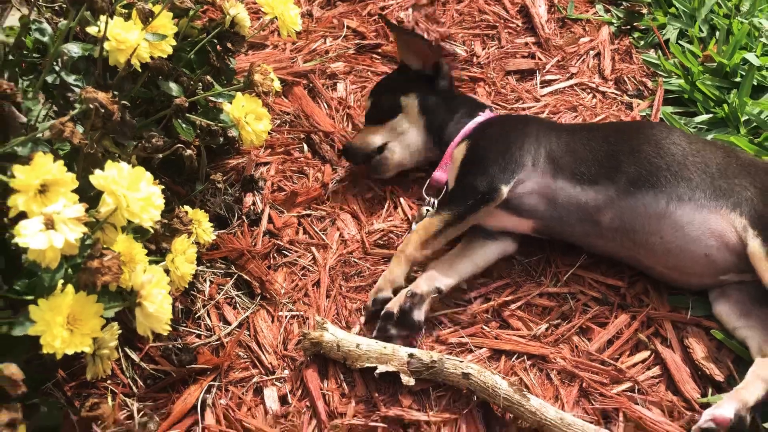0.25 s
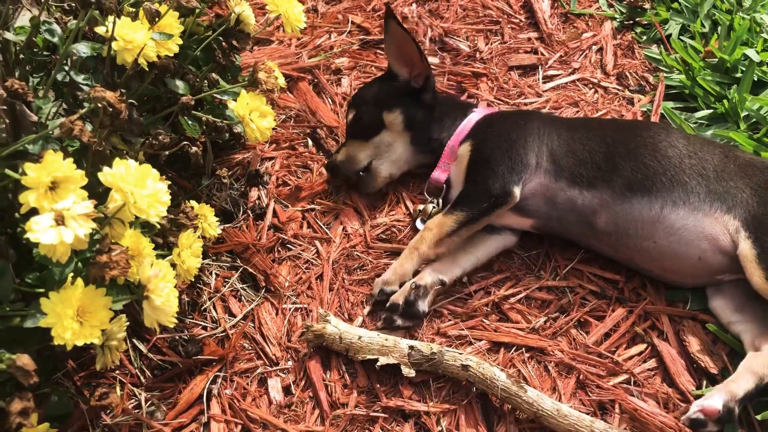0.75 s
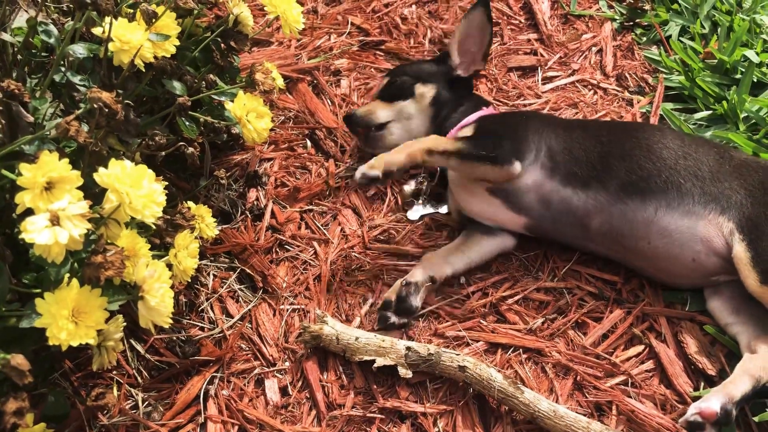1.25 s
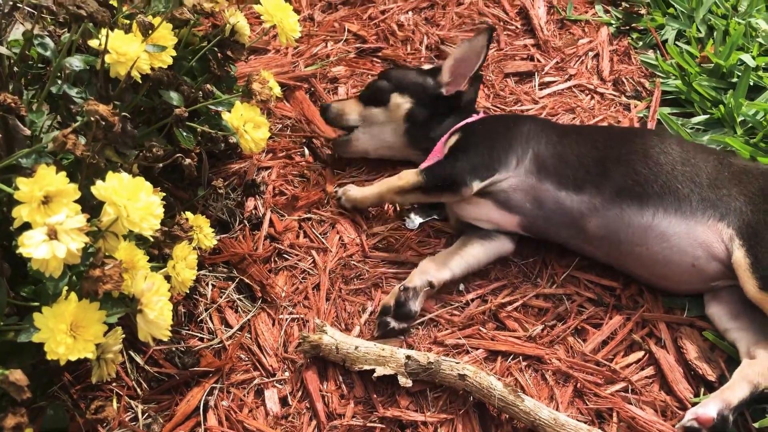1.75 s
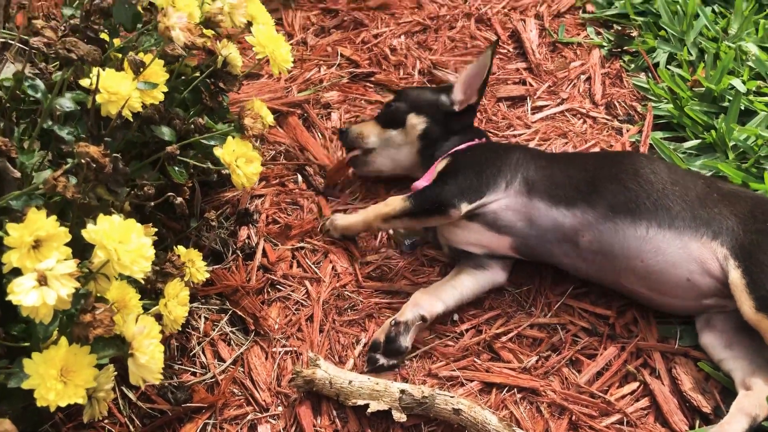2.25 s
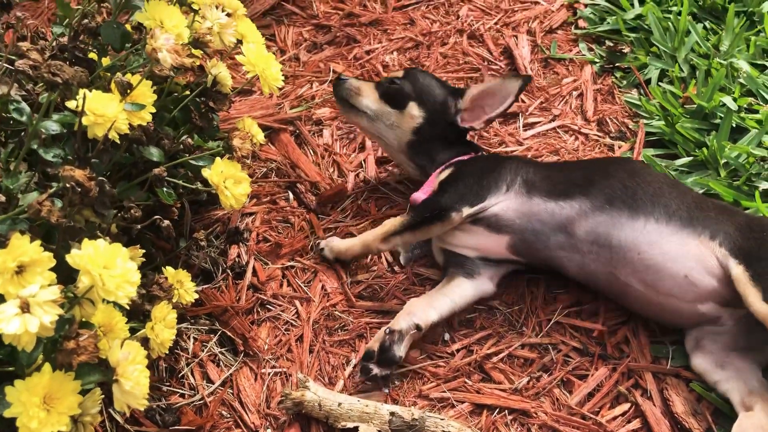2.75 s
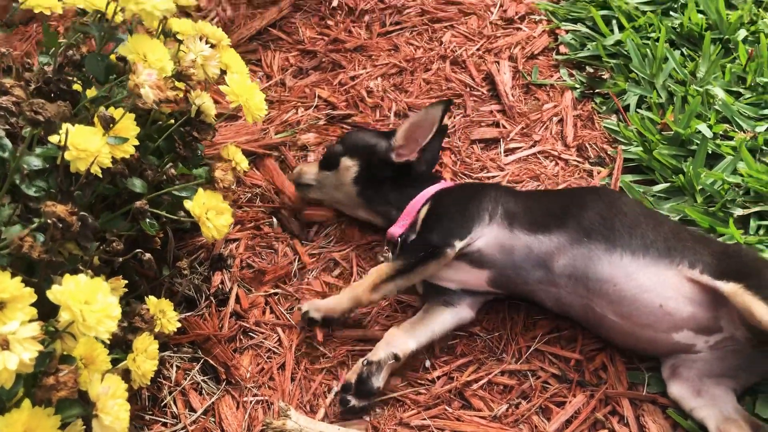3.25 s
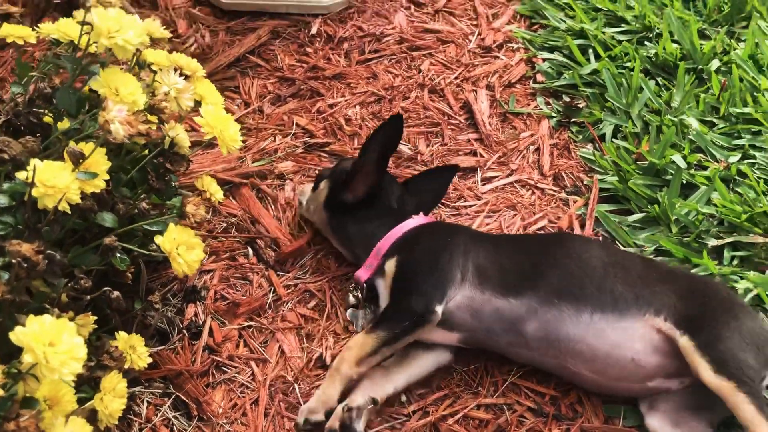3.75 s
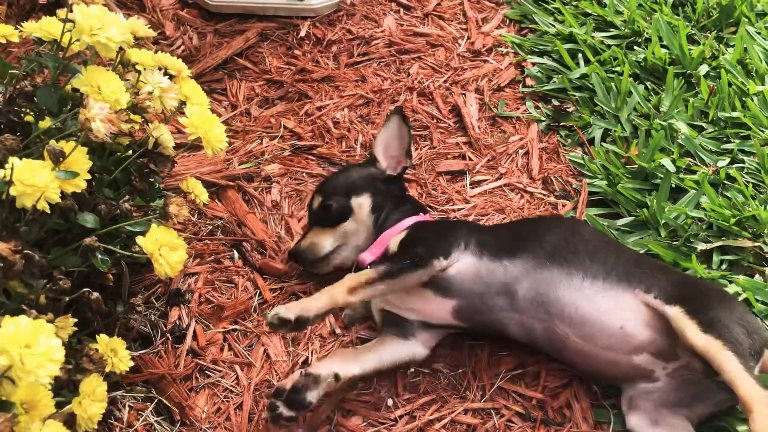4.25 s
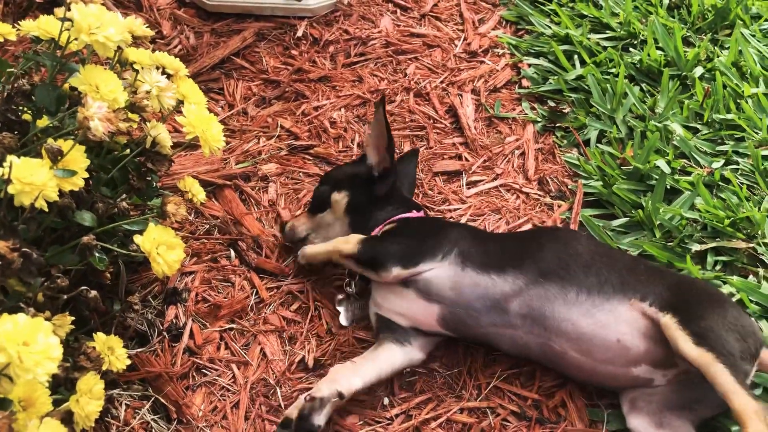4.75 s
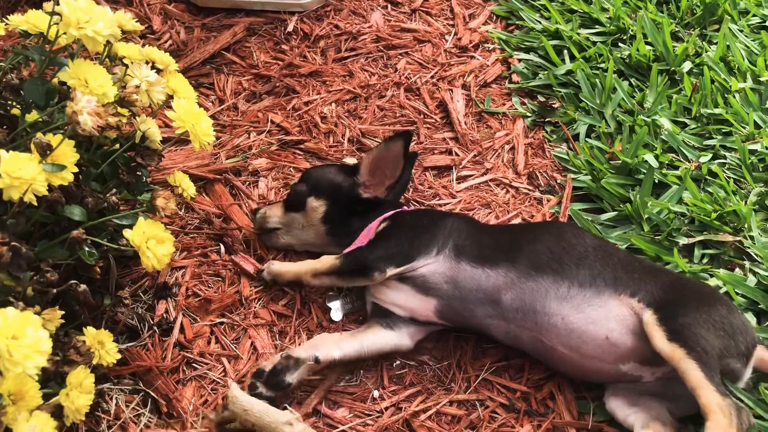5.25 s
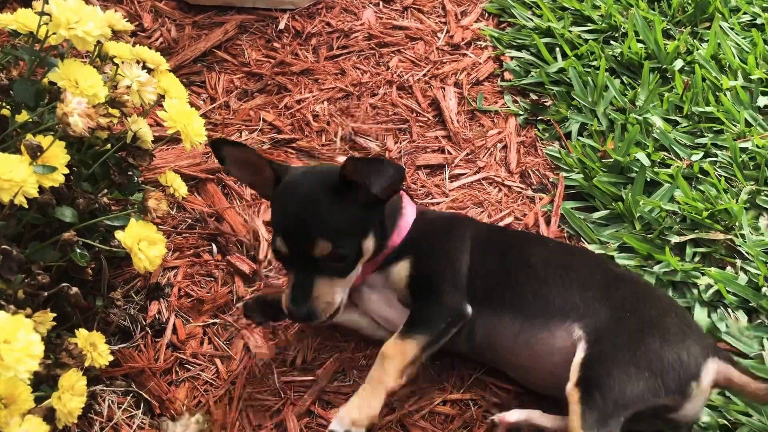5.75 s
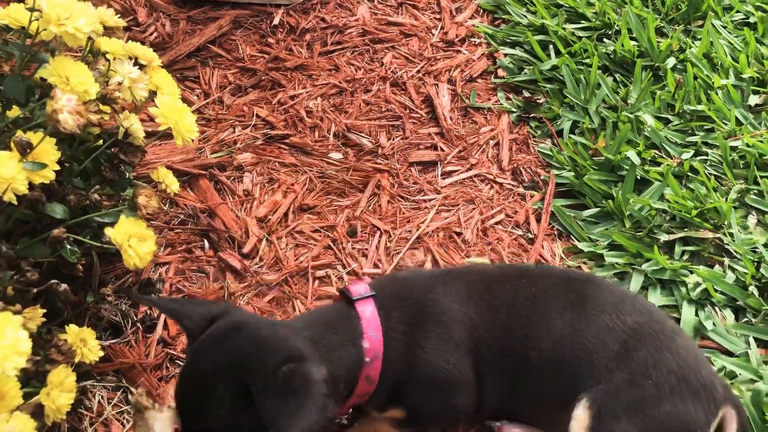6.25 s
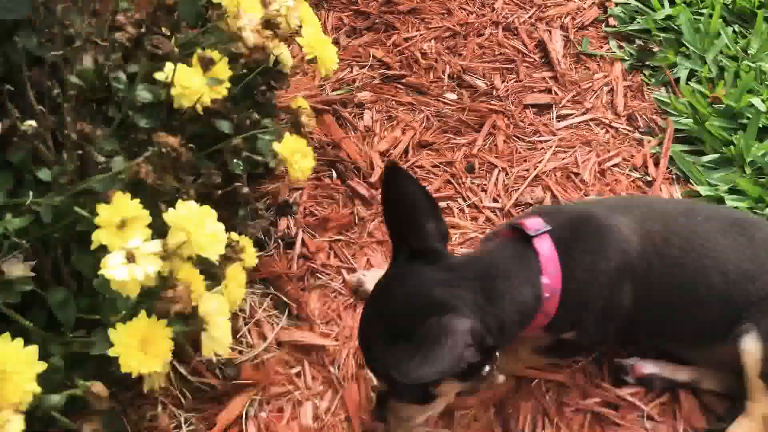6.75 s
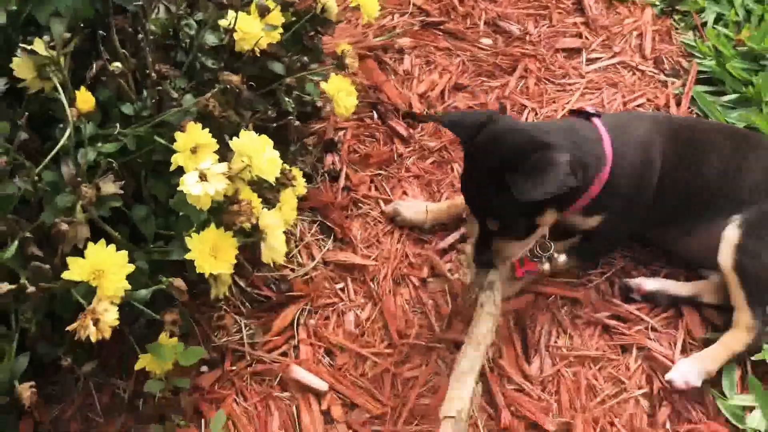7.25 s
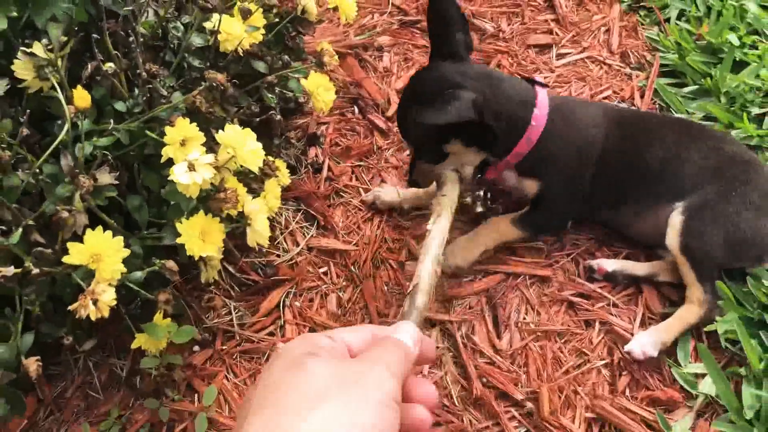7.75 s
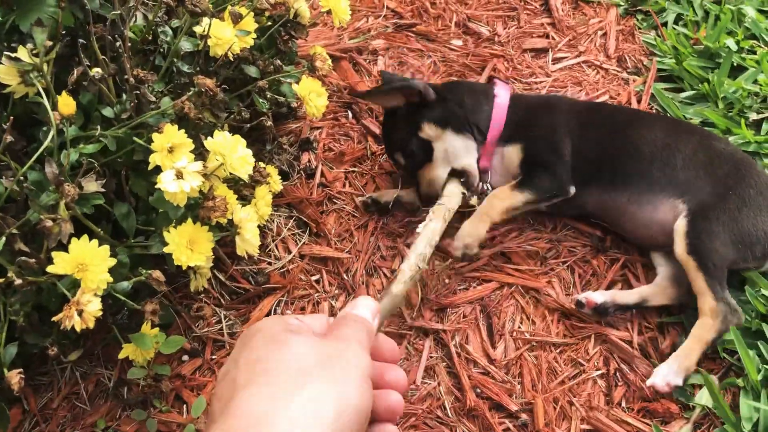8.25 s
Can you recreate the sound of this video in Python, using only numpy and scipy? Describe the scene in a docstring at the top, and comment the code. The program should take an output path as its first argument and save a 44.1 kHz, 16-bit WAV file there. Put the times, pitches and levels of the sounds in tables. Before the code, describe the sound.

Light tinny jingling of dog tags comes and goes with dry woody snaps and crackling bark chips, above a deep, faraway road rumble.

```python
"""In a garden, a puppy rolls on bark mulch. The metal tags on its collar clink and chatter
against each other and their ring: sine tones that fade between contacts, and clicks that set filters ringing.
The mulch rustles under its body as many tiny ringing grains, with dry snaps and woody knocks.
Far below, traffic hums and swells: noise shaped into bands, a low engine note and other wandering tones.
"""
import sys
import numpy as np
from scipy import signal
from scipy.fft import rfft, irfft, next_fast_len
from scipy.io import wavfile
from scipy.ndimage import uniform_filter1d

SR = 44100
rng = np.random.default_rng(int(sys.argv[2]) if len(sys.argv) > 2 else 0)


def dump_mix(stems):
    """Bounce the given channels to the path in sys.argv[1] as a 16-bit WAV at rate SR."""
    frames = np.atleast_2d(stems).T  # one column per channel
    limited = np.clip(frames, -1, 1)  # hard clip at full scale
    pcm = np.round(limited * 32767).astype(np.int16)
    wavfile.write(sys.argv[1], SR, pcm)


N = 375291

# Levels in the tables are starting points: the functions that play them may add a trim.

# Clear contacts of tags and ring: start_s, contact_db, then the levels of the five groups of tag tones
# (low_db, shimmer_db, high_1_db, high_2_db, high_3_db), and ring_s (time to fade by 60 dB, before other losses)
CLINK_CONTACTS = [(0.0463, -48, -74, -62.5, -78, -76, -76, 0.082),
                  (0.1221, -43, -90, -72, -90, -90, -90, 0.1),
                  (0.172, -44, -90, -60.5, -90, -90, -90, 0.063),
                  (0.582, -55, -59, -64, -67, -77, -80, 0.15),
                  (0.7403, -45, -84, -66, -90, -90, -90, 0.073), (1.082, -41, -66, -56, -67, -80, -70, 0.2),
                  (1.0958, -28, -55, -44, -43, -90, -45, 0.28), (1.124, -39, -47, -58, -63, -64, -55, 0.15),
                  (1.1626, -31, -38, -50, -53, -44, -44, 0.22),
                  (1.1757, -27, -35.5, -46, -51, -47, -71, 0.2),
                  (1.197, -35, -43, -59, -49, -55, -84, 0.39), (1.2185, -38, -42, -64, -49, -66, -75, 0.25),
                  (1.234, -34, -44, -51, -57, -63, -80, 0.2),
                  (1.242, -34, -43, -47.5, -58, -53, -76, 0.092),
                  (1.277, -45, -60, -56.5, -77, -74, -90, 0.31),
                  (1.2895, -42, -83, -61, -90, -81, -90, 0.2),
                  (1.3187, -35, -56, -60, -90, -83, -90, 0.063),
                  (1.3554, -45, -75, -53.5, -90, -88, -94, 0.08),
                  (1.387, -38, -90, -61.5, -90, -61, -56, 0.092),
                  (1.4312, -43, -52, -58, -90, -54, -83, 0.052),
                  (1.5534, -32, -64, -51.5, -90, -81, -62, 0.093),
                  (1.59, -47, -70, -59, -90, -90, -80, 0.14), (1.745, -51, -90, -60, -90, -78, -89, 0.11),
                  (2.36, -47, -55, -57.5, -90, -90, -90, 0.17), (2.3802, -49, -66, -68, -90, -90, -83, 0.1),
                  (2.419, -52, -58, -68, -89, -90, -85, 0.25), (2.445, -51, -55, -63, -79, -81, -90, 0.14),
                  (2.4892, -46, -52.5, -55, -90, -90, -86, 0.17),
                  (2.5106, -51, -56, -68, -90, -83, -90, 0.11),
                  (2.5528, -52, -55, -55.5, -90, -90, -83, 0.051),
                  (2.5748, -41, -46, -55.5, -90, -79, -73, 0.093),
                  (2.952, -46, -63, -69, -88, -87, -90, 0.11), (2.985, -45, -47, -58, -69, -81, -90, 0.046),
                  (3.004, -44, -52, -55, -65, -75, -90, 0.06), (3.059, -41, -65, -59, -59, -69, -90, 0.085),
                  (3.181, -48, -60, -61.5, -90, -82, -90, 0.1), (3.4266, -43, -90, -64, -90, -90, -92, 0.1),
                  (3.5192, -39, -50.5, -50.5, -65, -82, -90, 0.18),
                  (3.548, -38, -68, -53, -90, -80, -90, 0.058), (4.2369, -36, -67, -59, -80, -90, -75, 0.2),
                  (4.2657, -35, -90, -65, -90, -72, -86, 0.2),
                  (4.2782, -34, -48, -46.5, -59, -77, -90, 0.06),
                  (4.305, -22, -41, -48, -68, -36.5, -62, 0.12),
                  (4.3204, -38, -66, -53, -57, -64, -65, 0.12), (4.352, -37, -43, -52, -56, -52, -68, 0.12),
                  (4.383, -42, -53, -58, -82, -59, -90, 0.082), (4.418, -49, -52, -63, -65, -56, -74, 0.18),
                  (4.4376, -42, -48, -53, -74, -88, -83, 0.051),
                  (4.5032, -53, -51, -63, -68, -75, -86, 0.1), (4.559, -44, -54, -60, -76, -72, -90, 0.1),
                  (4.6034, -43, -54, -56.5, -90, -80, -81, 0.06),
                  (4.752, -39, -40, -53, -90, -58, -75, 0.04), (4.789, -32, -61, -59, -89, -80, -90, 0.11),
                  (4.8229, -35, -48, -63, -90, -61, -72, 0.047),
                  (4.835, -38, -52, -61, -72, -76, -90, 0.044),
                  (4.9778, -53, -78, -75, -90, -90, -90, 0.075),
                  (5.0277, -49, -56, -63, -83, -84, -88, 0.06),
                  (5.681, -26, -51, -48.5, -75, -70, -82, 0.055),
                  (5.712, -38, -60, -58, -90, -84, -84, 0.09), (5.76, -30, -49, -56, -90, -71, -90, 0.053),
                  (5.7979, -26, -46, -56, -70, -63, -89, 0.082),
                  (5.8371, -39, -46.5, -57, -60, -67, -90, 0.19),
                  (5.852, -39, -56, -60, -61, -70, -84, 0.14), (5.9154, -42, -53, -57, -77, -80, -90, 0.2),
                  (5.943, -39, -41, -47.5, -65, -66, -90, 0.2), (5.954, -34, -48, -50, -55, -57, -74, 0.2),
                  (5.974, -33, -48, -48, -52, -53, -65, 0.2), (5.989, -32, -34, -44.5, -50, -50, -71, 0.13),
                  (6.0073, -40, -44, -62, -69, -59, -90, 0.21), (6.017, -39, -40, -71, -67, -55, -90, 0.2),
                  (6.028, -39, -44, -49, -67, -63, -90, 0.19),
                  (6.045, -32, -36.5, -64, -73, -63, -90, 0.13),
                  (6.0644, -41, -50, -54, -77, -65, -81, 0.19), (6.0764, -42, -53, -66, -58, -64, -90, 0.2),
                  (6.097, -41, -50, -62, -61, -65, -82, 0.14), (6.172, -45, -60, -57, -57, -72, -59, 0.22),
                  (6.183, -38, -42, -59, -70, -72, -81, 0.066),
                  (6.2228, -26, -45, -80, -72, -70, -76, 0.046),
                  (6.248, -43, -43, -61, -69, -70, -88, 0.15),
                  (6.2664, -24, -37.5, -52, -40, -36, -88, 0.2),
                  (6.2835, -30, -56, -48, -37, -45, -90, 0.2),
                  (6.2915, -30, -37.5, -48, -41, -45, -90, 0.2),
                  (6.3018, -35, -49, -47, -45, -55, -76, 0.077),
                  (6.322, -24.5, -57, -55, -54, -60, -75, 0.083),
                  (6.3541, -32, -46, -54.5, -63, -52, -41, 0.22),
                  (6.3765, -35, -47, -60, -58, -60, -71, 0.2), (6.391, -39, -53, -62, -63, -75, -86, 0.19),
                  (6.4094, -49, -53, -69, -73, -76, -92, 0.1), (6.456, -53, -63, -69, -68, -65, -71, 0.2),
                  (6.4796, -46, -61, -65, -88, -75, -90, 0.17), (6.5146, -45, -57, -66, -58, -76, -88, 0.1),
                  (6.582, -39, -65, -51.5, -81, -63, -90, 0.2),
                  (6.5955, -32, -71, -58, -62, -52, -72, 0.17),
                  (6.6185, -39, -67, -60, -86, -67, -87, 0.18),
                  (6.6466, -43, -66, -58, -57, -61, -90, 0.21), (6.661, -32, -65, -64, -90, -74, -75, 0.08),
                  (6.6954, -34, -65, -57, -68, -90, -88, 0.064), (6.768, -43, -54, -56, -74, -65, -80, 0.2),
                  (6.784, -46, -60, -65, -70, -72, -89, 0.11),
                  (6.8258, -22.5, -35, -45, -49, -55, -90, 0.11),
                  (6.8446, -41, -41.5, -57, -59, -51, -90, 0.19),
                  (6.8634, -41, -51, -53, -69, -90, -90, 0.12),
                  (6.895, -28, -39.5, -63, -64, -40.5, -90, 0.077),
                  (6.9308, -26, -51, -51, -51, -68, -49, 0.067),
                  (6.9464, -33, -50, -51, -63, -52, -64, 0.11), (7.06, -36, -67, -60, -73, -90, -90, 0.094),
                  (7.094, -42, -57, -56, -82, -62, -86, 0.07), (7.2101, -42, -62, -68, -87, -90, -90, 0.06),
                  (7.265, -42, -53, -62, -84, -69, -73, 0.19), (7.2886, -50, -50, -69, -85, -93, -90, 0.06),
                  (7.3157, -48, -58, -60, -78, -74, -80, 0.2), (7.335, -42, -50, -55, -63, -54, -90, 0.23),
                  (7.3537, -44, -44, -59, -69, -61, -90, 0.086),
                  (7.3845, -51, -55, -58, -83, -80, -83, 0.049),
                  (7.4207, -49, -63, -76, -90, -90, -90, 0.06),
                  (7.4766, -50, -60, -62, -85, -90, -89, 0.12),
                  (7.607, -33, -37, -53, -66, -48, -45, 0.057), (7.631, -33, -48, -58, -75, -54, -70, 0.12),
                  (7.678, -42, -50.5, -57, -63, -63, -90, 0.38),
                  (7.7063, -17.5, -29.5, -41, -44, -54, -50, 0.12),
                  (7.724, -23, -38, -41.5, -44.5, -52, -59, 0.14),
                  (7.7505, -37, -51, -58, -55, -60, -82, 0.29), (7.791, -42, -48, -56, -50, -72, -83, 0.26),
                  (7.8156, -34, -46, -61, -60, -67, -90, 0.2),
                  (7.8275, -19, -30.5, -42, -56, -57, -36, 0.12),
                  (7.847, -36, -37, -62, -47, -57, -65, 0.11), (7.8731, -47, -60, -61, -56, -64, -70, 0.2),
                  (7.89, -43, -41, -63, -69, -48, -79, 0.048), (7.9364, -45, -62, -65, -73, -75, -55, 0.19),
                  (7.9487, -44, -57, -65, -69, -76, -77, 0.15),
                  (7.9807, -42, -42, -53, -66, -62, -46, 0.13),
                  (8.2472, -55, -72, -72, -64, -74, -90, 0.21),
                  (8.2724, -43, -80, -67, -58, -62, -90, 0.11),
                  (8.331, -42, -61, -57, -71, -69, -90, 0.082),
                  (8.371, -26, -44, -51, -73, -75, -77, 0.054), (8.4055, -47, -72, -64, -90, -90, -88, 0.1),
                  (8.4374, -49, -61, -61, -67, -71, -90, 0.2), (8.448, -39, -64, -56, -66, -65, -90, 0.2),
                  (8.465, -39, -44, -57, -62, -61, -90, 0.2), (8.4755, -39, -62, -63, -70, -73, -90, 0.2),
                  (8.4904, -51, -51, -71, -81, -68, -90, 0.06)]
# Tones of the tags in five groups, one for each group level above:
# pitch_hz, level_db (added to the group level), longest_s (time to fade by 60 dB, before other losses)
TAG_TONES = [
    [(4815, 1.5, 0.47), (4935, -5, 0.064), (4690, -9, .03)],
    [(5230, 4.5, 0.027), (6100, 4, 0.013)],
    [(11120, 3.5, 0.38), (10680, -20, .05)],
    [(12255, 2.5, 0.28), (12610, -2, 0.11), (13400, -8, .04), (11700, -17, .03)],
    [(15250, 8, .06)],
]
# How much light touches vary a tone: level in dB, pitch as a fraction, phase in radians
JOLT_DB, JOLT_PITCH, JOLT_RAD = 2.5, 0.0017, 0.85


def clinks():
    """Tag tones ring on from contact to contact; light touches jolt their level, pitch and phase."""
    touch_number = np.cumsum(rng.random(N) < 70 / SR)  # about 70 touches a second
    out = np.zeros(N)
    for group_db, tones in zip(np.transpose(CLINK_CONTACTS)[2:-1], TAG_TONES):
        for hz, db, longest_s in tones:
            jolts = rng.normal(0, 1, (touch_number[-1] + 1, 3))[touch_number]
            # a touch lasts about a millisecond
            louder, higher, shifted = uniform_filter1d(jolts, size=40, axis=0).T
            turns = np.cumsum(hz * (1 + JOLT_PITCH * higher)) / SR
            phase = 2 * np.pi * turns + JOLT_RAD * shifted
            # a contact takes a moment to pass its energy on
            height = uniform_filter1d(after_clink(group_db + db, longest_s), size=70)
            out += height * from_db(JOLT_DB * louder) * np.sin(phase)
    return treble(out)


SETTLE_S = 0.076  # a tag left alone comes to rest on the fur about this long after a clink


def after_clink(level_db, longest_s):
    """Each contact sets a new height, which fades until the next contact or until the tag rests."""
    start_s, ring_s = np.transpose(CLINK_CONTACTS)[[0, -1]]
    now = np.arange(N) / SR
    last = np.maximum(np.searchsorted(start_s, now) - 1, 0)
    age = np.abs(now - start_s[last])
    # losses add up: the tone's own and those of whatever holds the tag
    losses = 1 / longest_s + 1 / np.clip(ring_s, 0.01, 2)[last]
    fall_db = 60 * age * losses + 20 * (age / SETTLE_S) ** 4
    return from_db(level_db[last] - np.minimum(fall_db, 200)) * (now >= start_s[0])


# Dry snaps of single chips: start_s, level_db
CHIP_SNAPS = [(0.2184, -50), (0.3142, -50), (0.4564, -49), (0.4868, -37), (0.6192, -44), (0.6762, -40),
              (0.7667, -47), (0.8177, -32), (0.9822, -38), (0.9895, -48), (1.502, -45), (1.754, -39),
              (2.0974, -36), (2.3446, -38), (2.4814, -36), (2.8403, -36), (3.25, -48), (3.2784, -47),
              (3.2859, -34), (4.2184, -46), (4.4684, -44), (4.5384, -43), (4.573, -40), (4.6174, -39),
              (4.6498, -36), (4.7205, -27), (4.8024, -41), (5.0479, -43), (5.0591, -46), (5.0995, -32),
              (5.231, -33), (5.3702, -32), (5.3824, -46), (5.451, -40), (5.472, -40), (5.5425, -46),
              (6.685, -41), (7.0864, -35), (7.4854, -44), (7.5507, -26.5), (8.2854, -42), (8.3892, -24)]


def ticks():
    """Each contact and each snap clicks for about a millisecond; small tags and chips give no bass."""
    clicks = np.zeros(N)
    for start_s, level_db, *_ in [*CLINK_CONTACTS, *CHIP_SNAPS]:
        clicks[round(start_s * SR)] = from_db(level_db - 8.5)
    body = from_db(-6.0) * ring(clicks, 7600, 0.0015)
    snap = from_db(3.0) * ring(clicks, 11400, 0.00018)
    glint = from_db(-23.0) * ring(clicks, 12900, 0.0013)
    return treble(body + snap + glint)


# Quickly fading tones of the split ring and buckle: pitch_hz, level_db, fade_s (time to fall by 60 dB)
BUCKLE_TONES = [(4964, 6.5, 0.02), (4900, -21.5, 0.021), (5560, 4.5, 0.01), (5940, -2.5, 0.019),
                (6244, 3.5, 0.0055), (6490, -2, 0.012), (7000, -9.5, 0.0022)]


def chatter():
    """After each clink the ring and buckle bounce in quick small touches that set their tones ringing."""
    height = after_clink(np.transpose(CLINK_CONTACTS)[3], longest_s=0.26)
    touches = height * rms_one(grains(per_s=1000, spread_db=3.5))
    rings = sum(from_db(db) * ring(touches * rng.standard_normal(N), hz, fade_s)
                for hz, db, fade_s in BUCKLE_TONES)
    return from_db(-18.5) * treble(rings)


# Tone colour of the crackle and of the rasp: pitch_hz, level_db
CRACKLE_COLOUR = [(3000, -26), (4500, 4), (7000, 4.5), (9500, 3.5), (12500, -12.5)]
# Tone colour of the fine hiss: pitch_hz, level_db
FINE_COLOUR = [(9000, -16), (12000, -4.5), (16500, 2)]


def rasp():
    """The collar's rings rasp briefly after every clink: a broad burst of tiny ringing grains."""
    height = after_clink(np.transpose(CLINK_CONTACTS)[1], longest_s=0.075)
    grit = chips(per_s=7200, spread_db=-0.5, cycles=11.0)
    coarse = from_db(-24) * coloured(grit, CRACKLE_COLOUR)
    fine = from_db(-25) * coloured(grit, FINE_COLOUR)
    return height * (coarse + fine)


# Bouts in which the tags keep swinging: start_s, length_s, level_db
SWING_BOUTS = [(1.064, 0.23, -39.5), (1.55, 0.027, -56), (2.359, 0.03, -59), (2.42, 0.12, -49),
               (2.977, 0.059, -47), (3.488, 0.06, -49), (4.234, 0.35, -58), (4.556, 0.085, -57),
               (4.75, 0.08, -67), (5.679, 0.59, -43.5), (6.16, 0.26, -45), (6.57, 0.097, -55),
               (6.761, 0.17, -45), (7.056, 0.06, -53), (7.262, 0.18, -47), (7.513, 0.05, -55),
               (7.602, 0.49, -46), (8.336, 0.06, -50), (8.438, 0.072, -50)]


def jingle():
    """While the tags swing, light random touches strike their tones, each with a strength of its own."""
    start_s, length_s, level_db = np.transpose(SWING_BOUTS)
    bouts = swells(start_s + length_s / 2, length_s / 2, level_db - 12, order=6)
    touches = bouts * grains(per_s=130, spread_db=-1.0)
    rings = np.zeros(N)
    for group_db, tones in zip([1.0, -5.5, -9, -6, -25], TAG_TONES):
        for hz, db, longest_s in tones:
            fade_s = 1 / (1 / longest_s + 1 / 0.04)  # the tone's own loss plus a quick damping
            rings += from_db(group_db + db) * ring(touches * rng.standard_normal(N), hz, fade_s)
    return treble(rings)


# How much the body stirs the mulch: time_s, crackle_db, crunch_db
STIRRING = [(0, -79.5, -74), (1, -78.5, -73), (1.25, -79, -82), (1.5, -78.5, -72.5), (2.3, -80, -69.5),
            (2.5, -78, -71), (2.75, -76.5, -71.5), (3.1, -71, -71), (3.6, -72, -69.5), (3.85, -76, -67.5),
            (4.15, -78, -70.5), (4.3, -70, -69), (5, -69.5, -68.5), (5.6, -74, -70), (5.75, -64, -63.5),
            (6.5, -65.5, -65.5), (7.1, -72.5, -68.5), (7.5, -76.5, -68.5), (7.9, -69.5, -70),
            (8.5, -72, -66)]
# Short bursts of rustle and hiss: shifts in the mulch, and bright hiss following loud clinks:
# middle_s, half_length_s (stretched 1.6 times when played), crackle_db, crunch_db, fine_hiss_db
RUSTLE_BURSTS = [(0.263, 0.082, -71, -70, -74), (0.467, 0.034, -72, -67, -72), (.59, 0.039, -76, -74, -84),
                 (.78, 0.02, -73, -74, -67), (0.997, 0.048, -72, -74, -82), (1.105, .015, -65, -76, -53),
                 (1.605, .02, -72, -78, -76), (2.45, .1, -68, -70, -85), (3.043, 0.038, -75, -77, -75),
                 (3.221, 0.038, -68, -77, -64), (3.29, 0.0083, -54.5, -80, -68),
                 (3.513, .05, -67, -68, -85), (3.98, 0.049, -70.5, -75, -76), (4.222, 0.038, -68, -73, -69),
                 (4.467, 0.01, -64, -59, -63), (4.569, .04, -61.5, -61, -67), (4.674, 0.077, -64, -60, -66),
                 (4.923, .04, -70, -68, -69), (5.054, 0.024, -64, -59, -67), (5.16, 0.029, -57, -60, -62),
                 (5.224, .015, -54, -65, -61), (5.376, 0.043, -65, -71, -85), (5.9, 0.046, -65, -64, -69),
                 (5.98, 0.056, -64, -62, -68), (6.176, 0.013, -60, -61, -68), (6.275, .05, -64, -70, -67),
                 (6.366, 0.0079, -48, -61, -52), (6.772, .04, -67, -75, -76), (7.354, 0.033, -64, -72, -75),
                 (7.53, 0.038, -68, -60, -85), (7.848, .012, -70, -78, -54), (7.994, 0.016, -70, -71, -56),
                 (8.163, 0.053, -63.5, -66.5, -71), (8.359, 0.043, -61.5, -56, -58.5)]


def rustle():
    """Bark chips crackle in bright grains over a fine hiss and a lower crunch, with short bursts of all three."""
    middle_s, half_s, *burst_db = np.transpose(RUSTLE_BURSTS)
    crackle_db, crunch_db = in_time(STIRRING)
    calm_db = (crackle_db, crunch_db, crackle_db - 7)  # steady crackle, crunch and fine hiss
    crisp, dull, fine = (np.hypot(from_db(calm), swells(middle_s, 1.6 * half_s, db))
                         for calm, db in zip(calm_db, burst_db))
    crackle = chips(per_s=3500, spread_db=3.5, cycles=13.0)
    crunch = between(grains(per_s=900, spread_db=1.5), 1900, 4200)
    return (crisp * coloured(crackle, CRACKLE_COLOUR)
            + from_db(2.0) * fine * coloured(crackle, FINE_COLOUR)
            + from_db(-4.0) * dull * rms_one(crunch))


# Knocks of the stick and bark chips: start_s, level_db, pitch_hz
WOOD_KNOCKS = [(1.0963, -55, 3740), (1.1317, -44, 2270), (2.422, -45, 3270), (2.447, -44, 2680),
               (4.648, -34.5, 2366), (4.814, -40.5, 3110), (5.0315, -38, 3410), (5.147, -37, 1940),
               (5.2315, -40, 3820), (5.8396, -48, 3090), (5.9185, -43, 3590), (5.9723, -52, 3910),
               (6.2659, -51, 3960), (6.585, -54, 3434), (6.932, -54, 1905), (7.5043, -53, 2150),
               (7.518, -30.5, 3900), (7.552, -33, 2200), (8.314, -42, 2460)]


def knocks():
    """Each knock is a short woody ring at its own pitch, with weaker side tones and a dry noise crack."""
    out = np.zeros(N + SR)
    t = np.arange(SR // 50) / SR
    cracks = between(rng.standard_normal((len(WOOD_KNOCKS), len(t))), 1200, 5000)
    for (start_s, level_db, hz), crack in zip(WOOD_KNOCKS, cracks):
        wood = np.sin(2 * np.pi * hz * t)
        wood += 0.31 * np.sin(2 * np.pi * 1.66 * hz * t)
        wood += 0.12 * np.sin(2 * np.pi * 0.71 * hz * t)
        fade = from_db(level_db - 7.5 - 60 * t / 0.012)  # falls by 60 dB in 12 ms
        out[round(start_s * SR):][:len(t)] += fade * (wood + 1.33 * crack)
    return out[:N]


# A narrow dry scratch: time_s, level_db
SCRATCH = [(5.27, -90), (5.3, -61), (5.37, -72), (5.41, -67), (5.44, -92)]


def scuff():
    """A dry scratch: uneven grains ring in a band near 8.6 kHz, with a weaker one near 5.6 kHz."""
    clicks = grains(per_s=700, spread_db=3.0)
    scratch = ring(clicks, 8600, 0.0018) + 0.6 * ring(clicks, 5600, 0.0025)
    return from_db(in_time(SCRATCH)[0]) * rms_one(scratch)


# Swelling of the traffic: time_s, deep_rumble_db, engine_drone_db, upper_drone_db, tyre_roar_db
TRAFFIC_LEVELS = [(0.05, -46, -43, -45, -55.5), (0.07, -39, -53, -46.5, -58.5),
                  (0.87, -47, -46, -51.5, -60), (1.13, -47.5, -49.5, -47, -60),
                  (2.27, -41.5, -46, -51, -55.5), (2.41, -48, -41, -49, -54.5),
                  (2.55, -42, -44, -44.5, -57), (3.04, -41.5, -42.5, -38, -48.5),
                  (3.26, -38, -45, -42.5, -48), (3.86, -42, -43, -49.5, -51.5),
                  (4.35, -37.5, -41.5, -47.5, -54), (4.5, -41.5, -49, -43.5, -53.5),
                  (4.68, -39.5, -41, -41, -46), (5.08, -37.5, -37.5, -44, -53),
                  (5.31, -38.5, -36, -46, -43.5), (5.87, -41, -47, -41.5, -49.5),
                  (6.18, -40, -42.5, -48, -53.5), (7.28, -40.5, -46.5, -51, -52),
                  (7.96, -44, -46, -50, -54), (8.26, -41.5, -48.5, -51, -59),
                  (8.4, -40, -47.5, -47.5, -54.5), (8.45, -42, -47, -48, -56.5)]
# Tone colours of those four bands, then of the far hiss: pitch_hz, level_db
RUMBLE_COLOUR = [(15, -75), (25, -23), (47, -18), (63, 0), (80, 0), (119, -4), (140, -7.5), (180, -41),
                 (310, -120)]
DRONE_COLOUR = [(76, -26.5), (130, -4.5), (156, 4.5), (205, -5.5), (270, -18.5), (450, -120)]
UPPER_DRONE_COLOUR = [(120, -26.5), (205, -0.5), (261, 0), (344, -11), (380, -16), (490, -44), (840, -120)]
ROAR_COLOUR = [(200, -35), (340, -6.5), (440, 0), (466, 2), (555, 0.5), (850, -16.5), (1100, -51),
               (1870, -120)]
AIR_COLOUR = [(350, -29), (600, -11), (837, -5.5), (910, -5.5), (1360, -11), (1900, -20), (4480, -35.5),
              (4800, -41.5), (14200, -41.5), (15600, -40), (16500, -41)]
# A low engine note, and a second wandering tone that roughens the rumble: time_s, pitch_hz, level_db
LOW_TONES = [
    [(0.0, 63.3, -53), (0.14, 64.0, -38), (1.28, 63.8, -38.5), (2.25, 70.7, -40), (2.96, 64.8, -38),
     (3.34, 65.6, -48.5), (3.81, 70.8, -53), (4.19, 64.25, -39), (6.18, 70.7, -39), (7.41, 66.6, -36.5),
     (7.72, 72, -57), (7.93, 64.7, -63), (8.24, 70.9, -32.5), (8.5, 68.2, -40)],
    [(0.0, 76.2, -39.5), (1.77, 80.15, -41), (3.57, 70.9, -46), (4.02, 85.4, -45), (4.28, 73, -38),
     (4.57, 87.1, -52), (4.9, 75.78, -35.5), (7.53, 72.1, -37.5), (7.79, 86.73, -41), (8.5, 72.0, -46)],
]
# Two faint hums that come and go: time_s, pitch_hz, level_db
FAINT_HUMS = [
    [(0, 159, -56), (.3, 158, -45.5), (1.2, 156, -52.5), (1.6, 160, -58)],
    [(.5, 388, -62.5), (1.1, 390, -60), (1.75, 385, -71), (2.14, 386.5, -52.5), (2.5, 386, -71)],
]


def traffic():
    """Four noise bands rise and fall, with an engine note, a roughening tone, faint hums and far hiss."""
    noise = rng.standard_normal((5, N))
    colours = (RUMBLE_COLOUR, DRONE_COLOUR, UPPER_DRONE_COLOUR, ROAR_COLOUR)
    bands = sum(from_db(db) * coloured(white, colour)
                for db, white, colour in zip(in_time(TRAFFIC_LEVELS), noise, colours))
    low_tones = from_db(-7.0) * sum(map(tone, LOW_TONES))
    hums = from_db(-0.5) * sum(map(tone, FAINT_HUMS))
    far_hiss = from_db(-58.0) * coloured(noise[4], AIR_COLOUR)
    return bands + low_tones + hums + far_hiss


# Hollow narrow-band swells in the traffic roar, several of which may belong to one pass:
# middle_s, half_length_s, pitch_hz, level_db
HOLLOW_SWELLS = [(3.16, .5, 526, -55), (3.8, 0.29, 514, -57), (4.701, 0.34, 575, -48.5),
                 (5.33, 0.24, 490, -49.5), (5.602, 0.29, 581, -54)]


def hollow_roar():
    """Noise goes twice through one resonance, under a rounded rise and fall for each swell."""
    white = rng.standard_normal(N)
    fade_s = 0.017  # each resonance falls by 60 dB in this time
    out = np.zeros(N)
    for middle_s, half_s, hz, db in HOLLOW_SWELLS:
        hollow = rms_one(ring(ring(white, hz, fade_s), hz, fade_s))
        out += swells(np.array([middle_s]), np.array([half_s]), np.array([db])) * hollow
    return out


def tone(rows):
    """A wavering sine that fades in and out over 0.1 s outside the ends of its table."""
    hz, db = in_time(rows)
    first_s, last_s = rows[0][0], rows[-1][0]
    fade = np.interp(np.arange(N) / SR, [first_s - 0.1, first_s, last_s, last_s + 0.1], [0, 1, 1, 0])
    return fade * np.sqrt(2) * from_db(db) * np.sin(2 * np.pi * np.cumsum(hz) / SR)


def chips(per_s, spread_db, cycles):
    """Crackle: each grain rings a few cycles at one of 14 pitches."""
    clicks = grains(per_s, spread_db)
    dealt = rng.integers(0, 14, N)
    pitches_hz = np.geomspace(3000, 15500, 14)
    return sum(ring(clicks * (dealt == k), hz, cycles / hz) for k, hz in enumerate(pitches_hz))


def grains(per_s, spread_db):
    """Random clicks of uneven size and sign."""
    sizes = from_db(spread_db * np.minimum(rng.exponential(1, N), 4)) * rng.choice([-1, 1], N)
    return sizes * (rng.random(N) < per_s / SR)


def ring(clicks, hz, fade_s):
    """A unit click sets off a sine that starts near height 1 and falls by 60 dB in fade_s."""
    r = from_db(-60 / (fade_s * SR))
    w = 2 * np.pi * hz / SR
    return signal.lfilter([0, np.sin(w)], [1, -2 * r * np.cos(w), r * r], clicks + 1e-18)


def swells(middle_s, half_s, level_db, order=2):
    """Gain of summed swells, 20 dB down half_s from the middle; higher order gives flatter tops."""
    now = np.arange(0, N, 32) / SR
    distance = (now - middle_s[:, None]) / half_s[:, None]
    drop_db = 20 * np.minimum(distance ** 2, 100) ** (order / 2)
    power = from_db(level_db[:, None] - drop_db) ** 2
    return np.interp(np.arange(N) / SR, now, np.sqrt(power.sum(0)))


def coloured(x, spectrum):
    """Shapes x by a table of pitch_hz and level_db, 90 dB down outside its ends; rms 1."""
    size = next_fast_len(N)
    hz, db = np.transpose(spectrum)
    log_hz = np.log(np.arange(size // 2 + 1) * SR / size + 1)  # the 1 avoids log of zero
    gain = from_db(np.interp(log_hz, np.log(hz), db, -90, -90))
    return rms_one(irfft(rfft(x, size) * gain, size)[:N])


def treble(x):
    """Keeps what lies above about 4.2 kHz."""
    return signal.sosfilt(signal.butter(4, 4200, "high", fs=SR, output="sos"), x)


def between(x, low_hz, high_hz):
    """Keeps the band between two pitches."""
    return signal.sosfilt(signal.butter(2, [low_hz, high_hz], "band", fs=SR, output="sos"), x)


def in_time(rows):
    """Columns of a curve table after its time column, one value per sample."""
    time_s, *columns = np.transpose(rows)
    return [np.interp(np.arange(N) / SR, time_s, column) for column in columns]


def from_db(db):
    """Gain of a level in dB."""
    return 10 ** (np.asarray(db) / 20)


def rms_one(x):
    """Scales x to an rms (average strength) of 1."""
    return x / np.sqrt(np.mean(x ** 2) + 1e-20)


def scene():
    """Tags and mulch close by, traffic far off."""
    tags = clinks() + ticks() + chatter() + rasp() + jingle()  # ticks also holds the snaps of chips
    mulch = rustle() + knocks() + scuff()  # rustle also holds the bright hiss after loud clinks
    road = traffic() + hollow_roar()
    return (tags + mulch + road)[None]


def record(dry):
    """Cuts the top: 55 dB down from 16.3 kHz upward."""
    return signal.sosfilt(signal.cheby2(14, 55, 16300, fs=SR, output="sos"), dry)


dry = scene()
out = record(dry)
dump_mix(out)
```